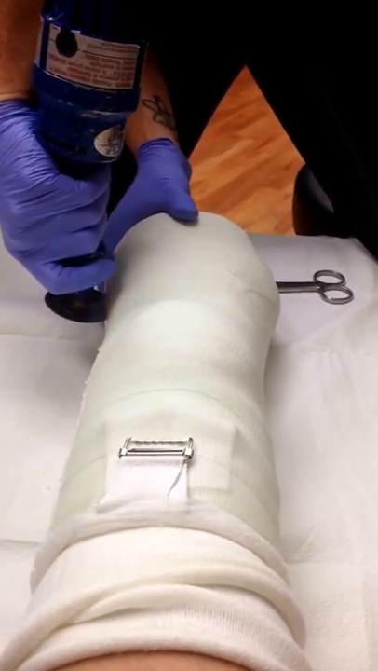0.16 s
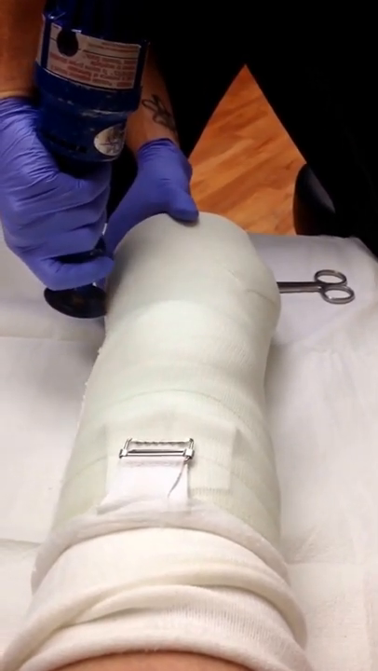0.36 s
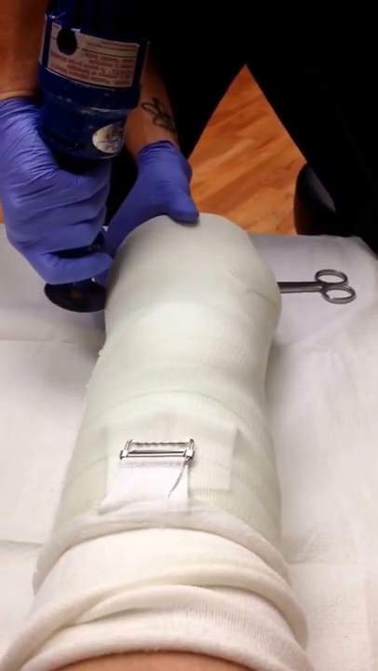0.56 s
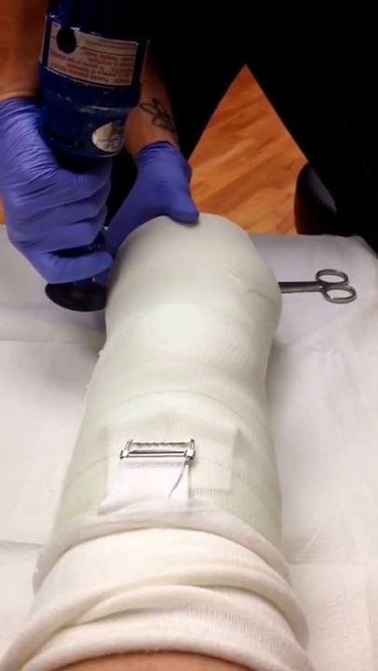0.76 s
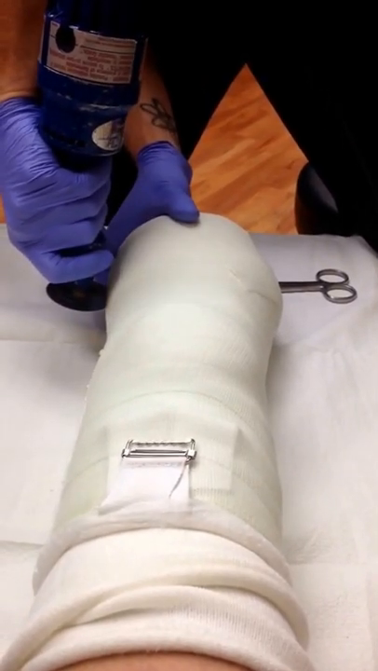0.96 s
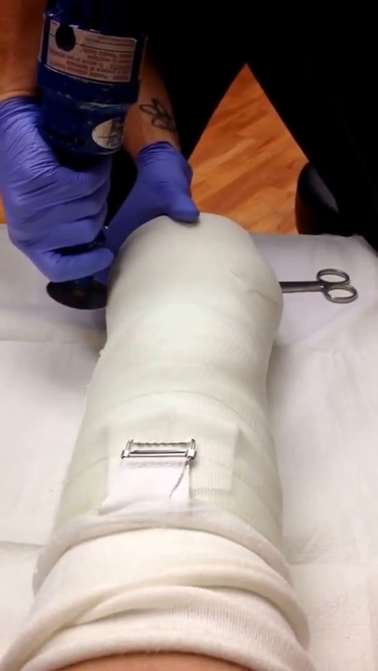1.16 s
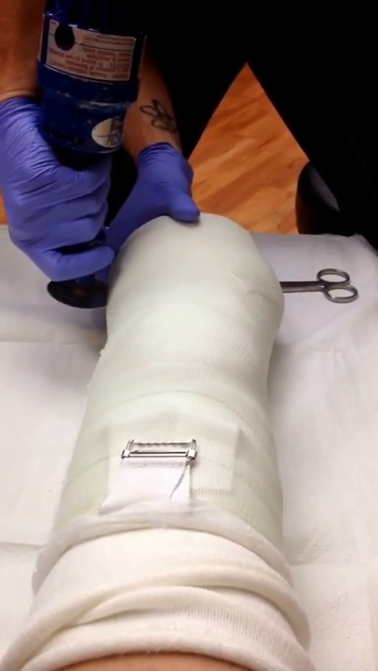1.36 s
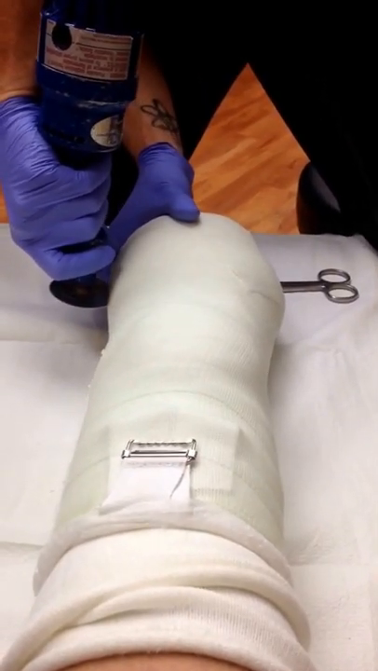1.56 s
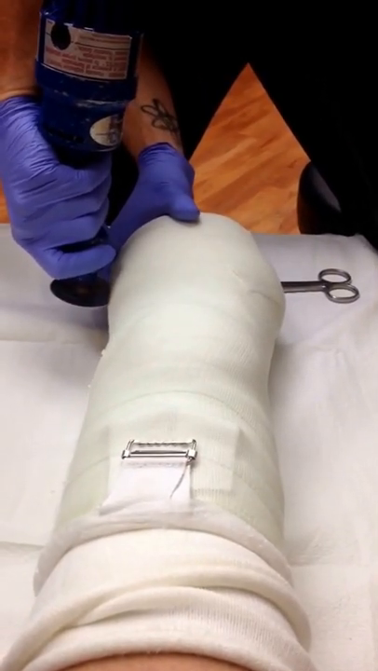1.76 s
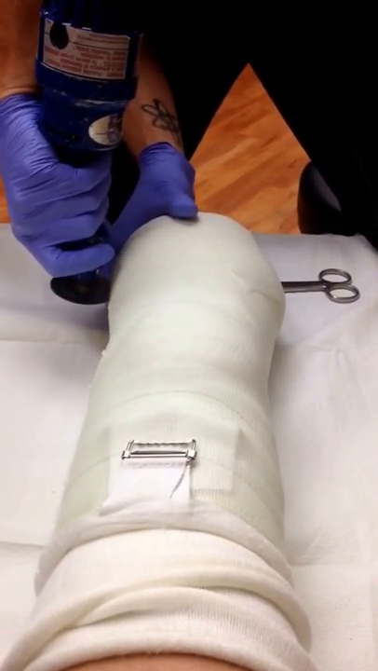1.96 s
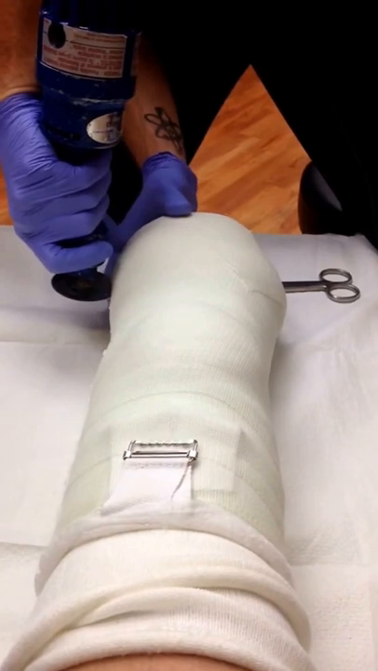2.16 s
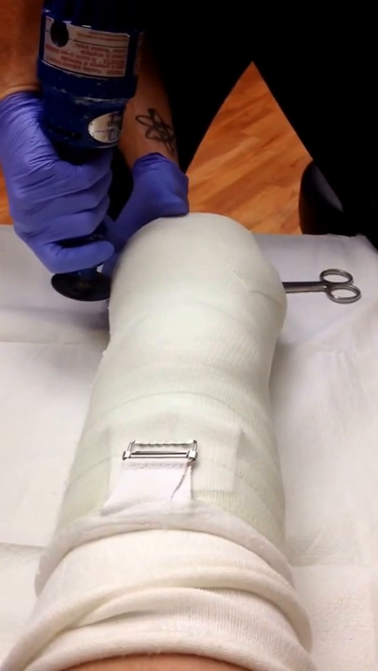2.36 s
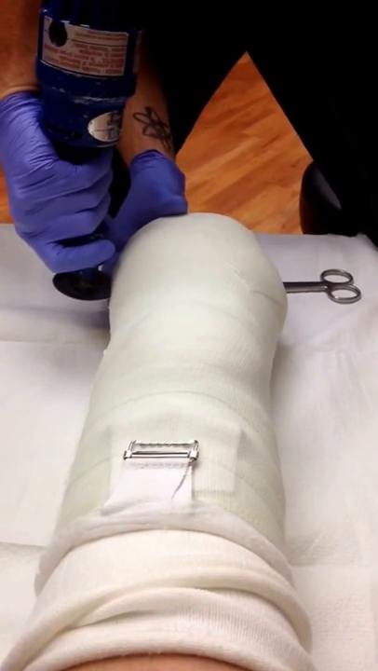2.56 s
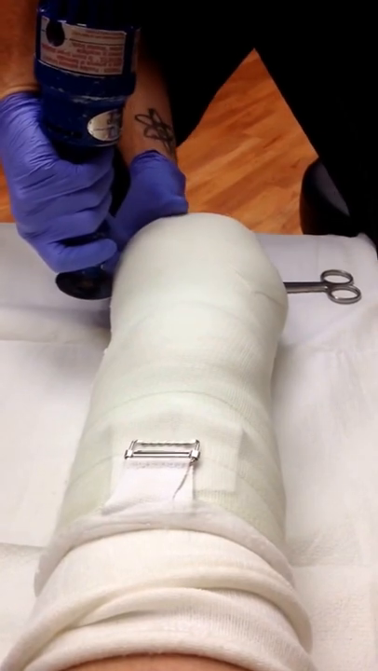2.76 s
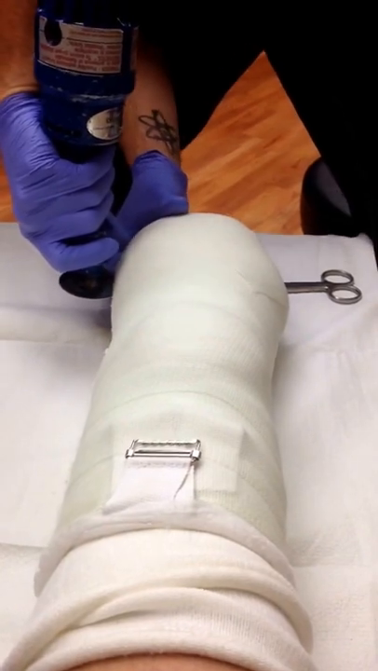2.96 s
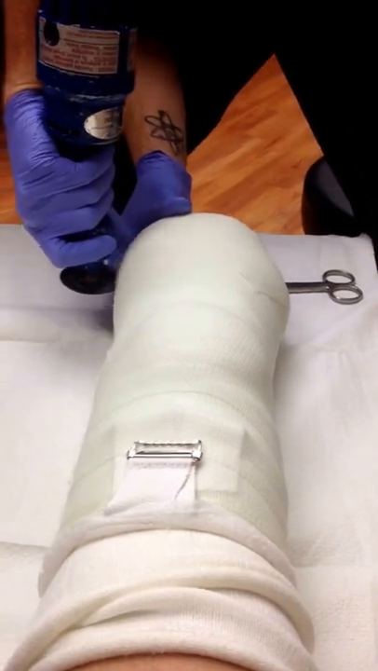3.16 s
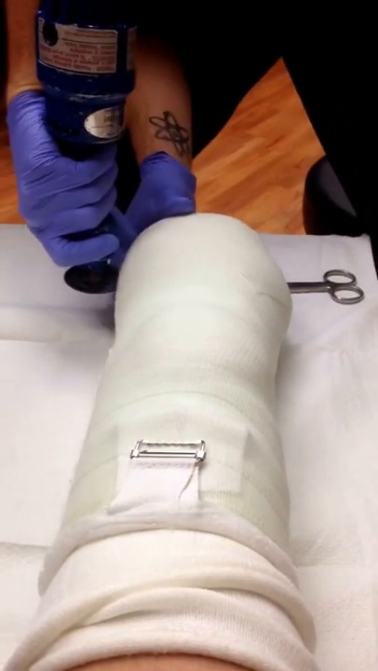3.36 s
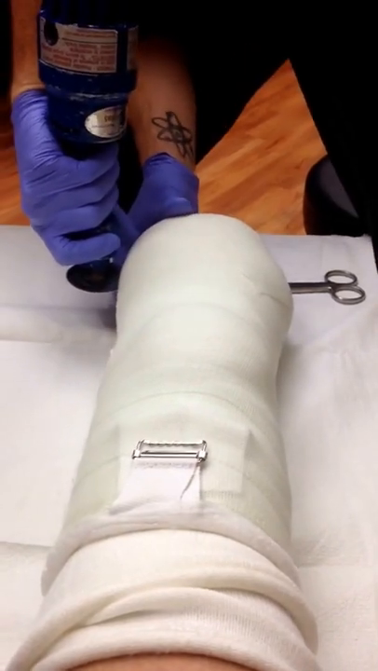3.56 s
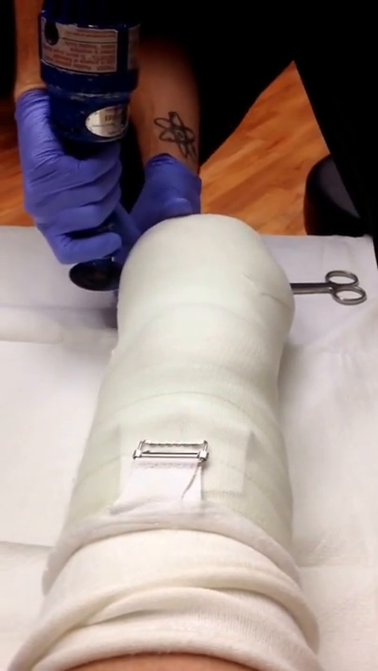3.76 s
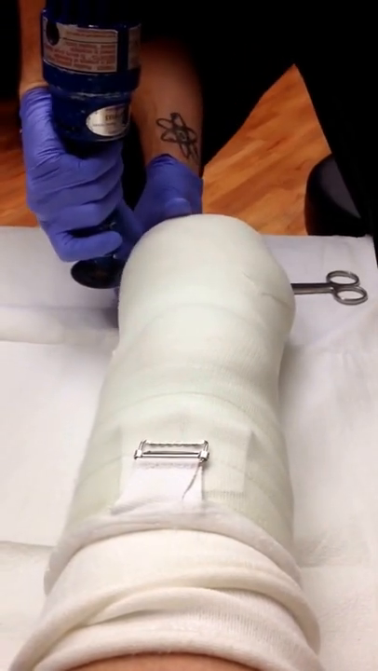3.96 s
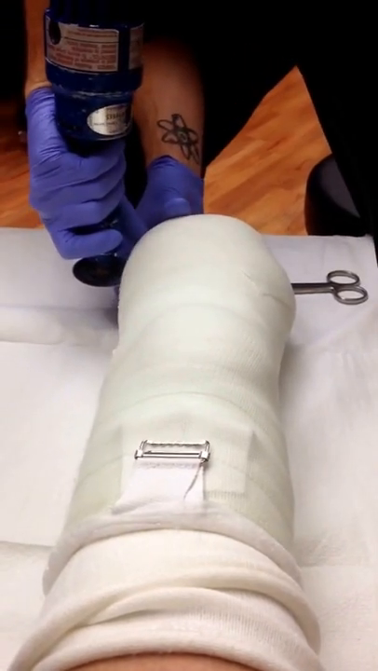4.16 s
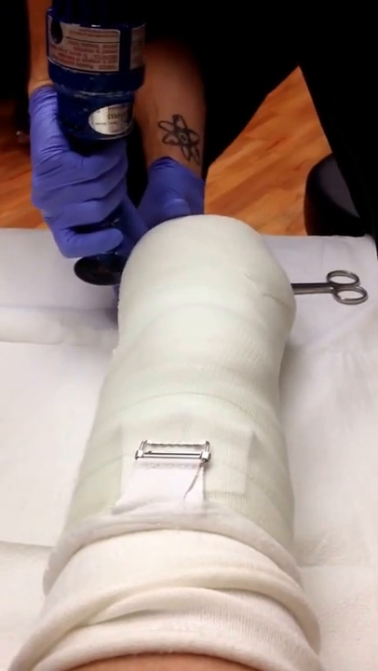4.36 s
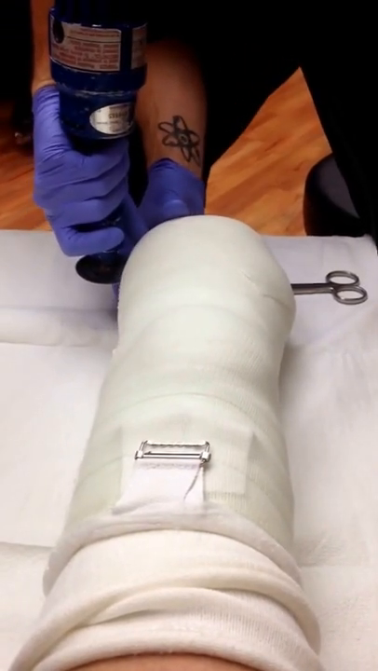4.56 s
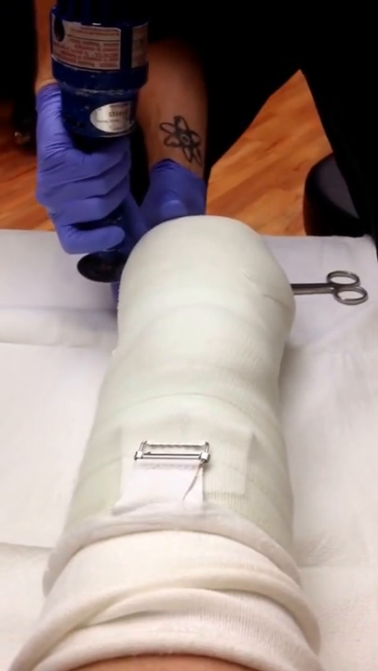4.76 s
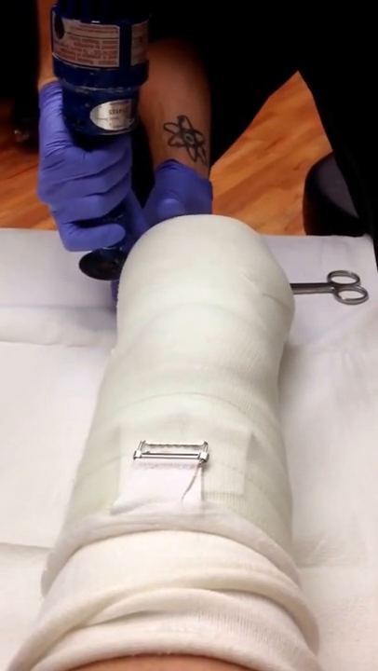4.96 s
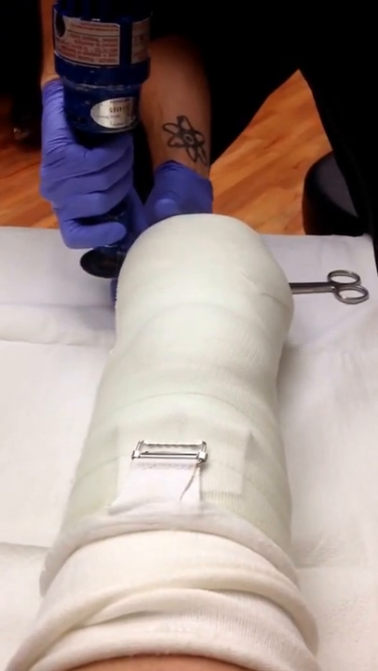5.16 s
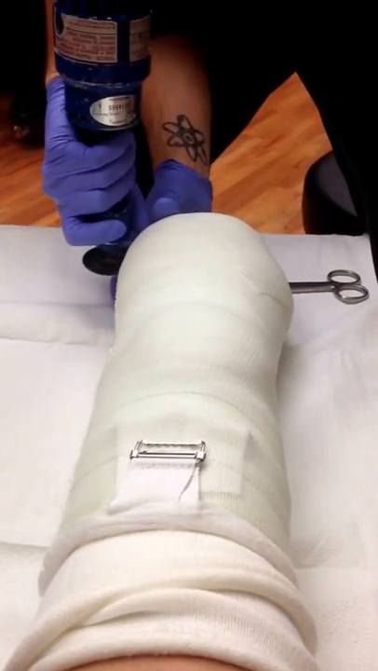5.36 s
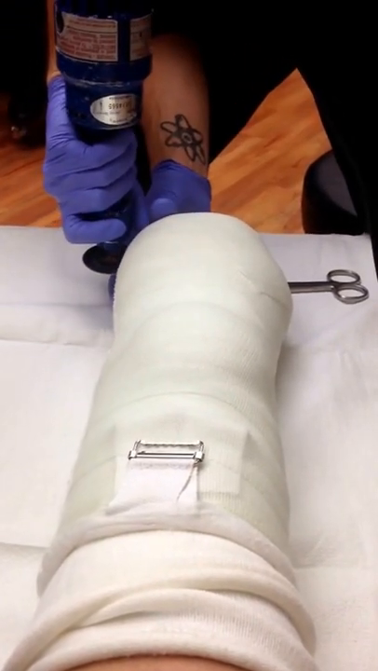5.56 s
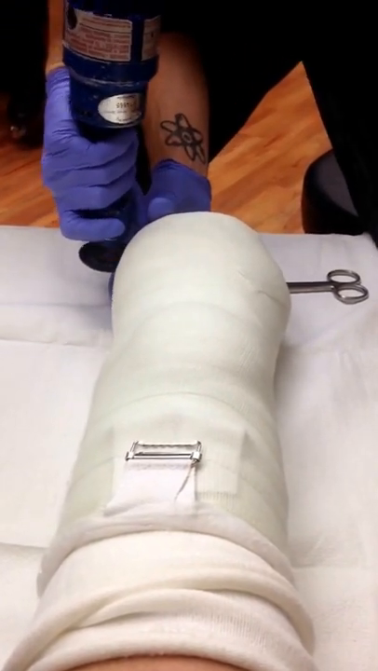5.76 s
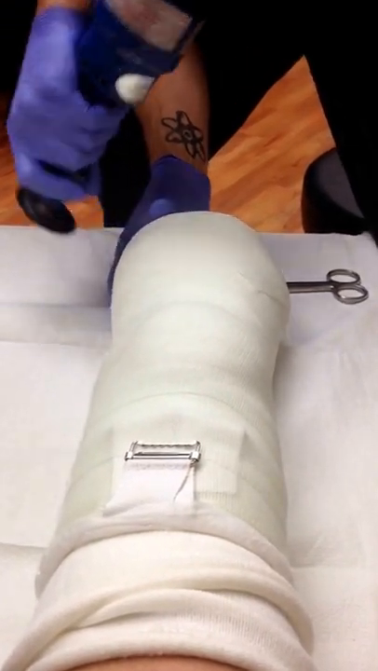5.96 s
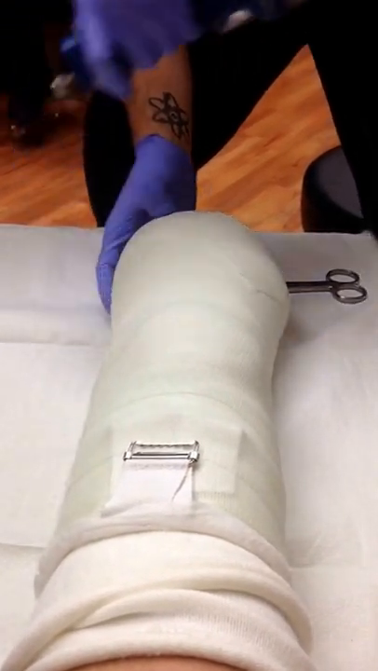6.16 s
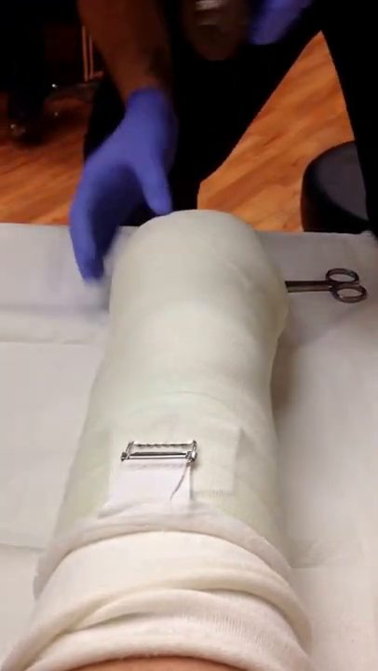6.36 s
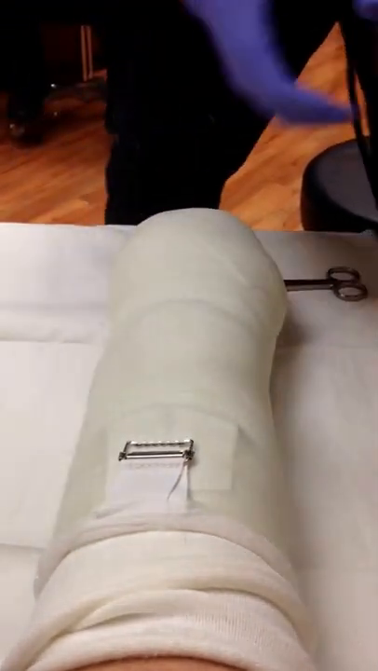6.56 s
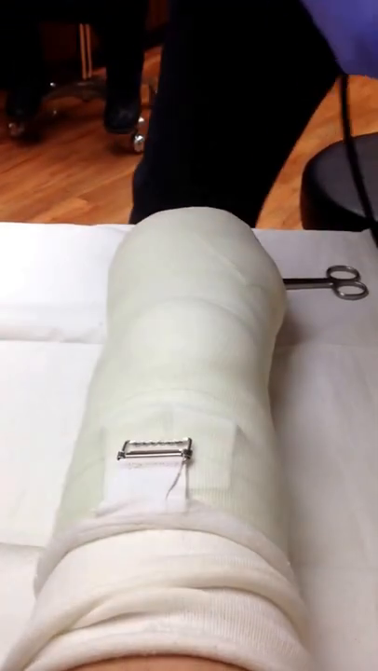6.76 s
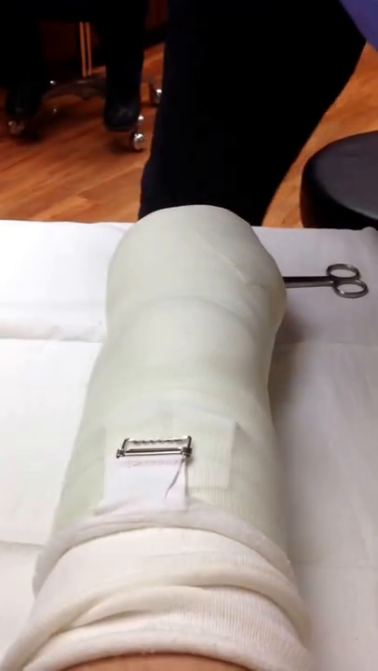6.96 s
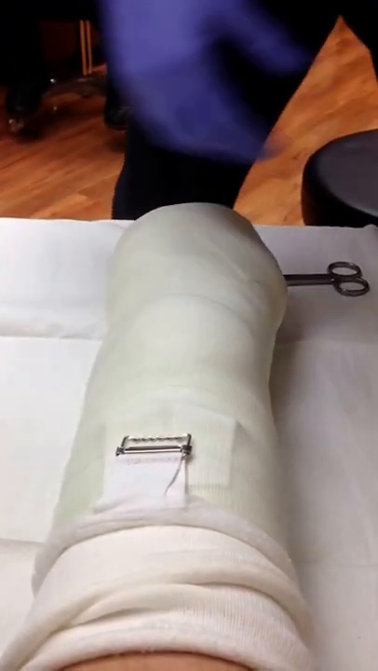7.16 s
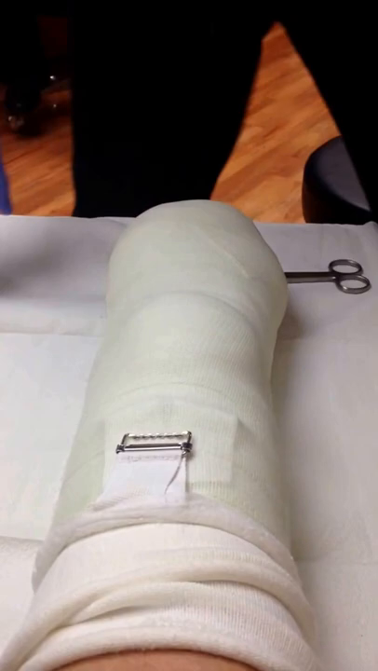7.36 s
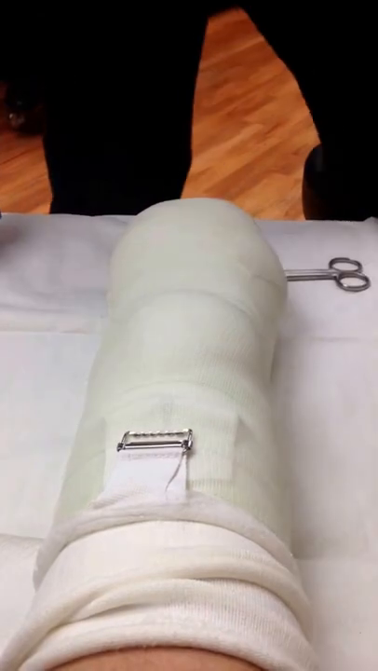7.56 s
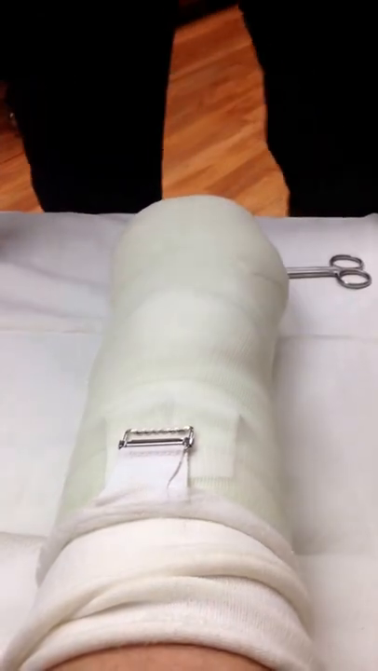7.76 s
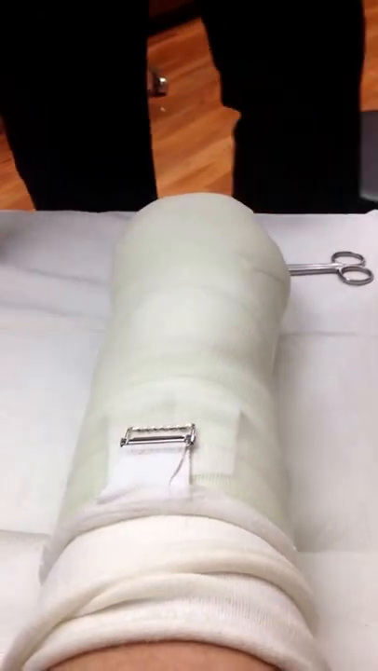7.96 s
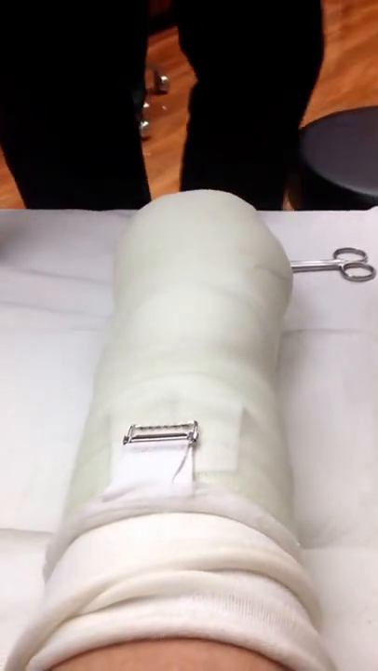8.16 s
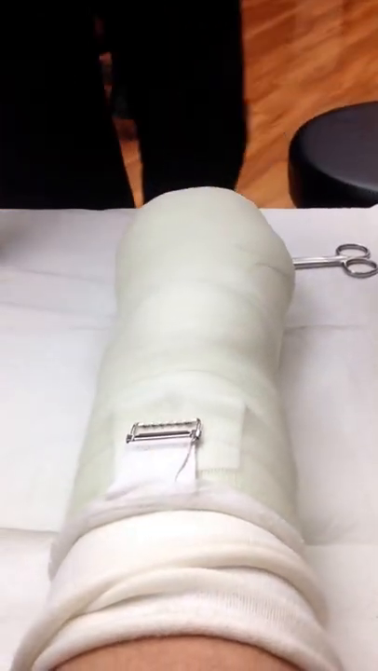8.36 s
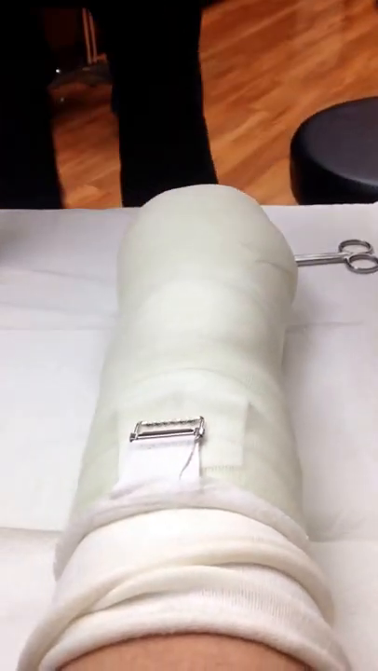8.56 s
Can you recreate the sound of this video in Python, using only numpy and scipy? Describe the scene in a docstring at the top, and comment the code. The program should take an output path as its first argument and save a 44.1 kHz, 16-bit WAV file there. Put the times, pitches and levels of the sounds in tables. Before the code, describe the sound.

An electric oscillating saw cuts a hard leg cast with a loud hum, buzz and gritty rasp, its pitch sagging under pressure. After about six seconds it lifts out and winds up to a higher whine, the loose steel blade jingling and squealing. Cooling air rushes throughout, and a few very faint steps pass underneath. The microphone is close, in a clinic room.

```python
"""An oscillating cast saw bites along a hard leg cast, lifts out near 5.9 s and is carried off running.
Every stroke shakes the shell into a hum and buzz while fibres rasp in the slot; load drags the pitch down.
Out of the cut the motor winds up, its gears whine and the loose steel blade jingles and squeals.
Cooling air rushes throughout, over faint mains hum and a few soft steps. Close up, in mono."""
import sys
import numpy as np
from scipy import signal
from scipy.fft import rfft, irfft, next_fast_len
from scipy.io import wavfile
from scipy.ndimage import uniform_filter1d

SR = 44100
rng = np.random.default_rng(int(sys.argv[2]) if len(sys.argv) > 2 else 0)


def unload_wav(signal):
    """Save mono or channel-first audio to the path in sys.argv[1] as 16-bit WAV at rate SR, clipped to [-1, 1]."""
    wavfile.write(
        sys.argv[1],
        SR,
        np.round(np.clip(np.atleast_2d(signal).T, -1, 1) * 32767).astype(np.int16),
    )


N = 379242
T = np.arange(N) / SR
PHASES = rng.random(size=32)  # start of each harmonic, in turns
HEEL_FROM_S, LIFT_S = 4.1, 5.9  # the cut turns from side wall to heel; the blade leaves the slot
USUAL_HZ, FREE_HZ = 245.1, 317.4  # stroke rate under an ordinary push, and running free
RIPPLE_HZ, RIPPLE_TURNS = 120, .002  # torque ripple, and how far it shifts the stroke

# stroke rate in the cut: t/s, f/Hz
LOADED_SPEED = [(0.0, 271), (0.31, 259), (0.47, 264), (0.67, 259), (1.08, 240.6), (1.43, 232.6),
                (1.71, 231.7), (1.97, 233.8), (2.27, 249), (2.66, 247.6), (2.87, 244.3), (3.15, 229.4),
                (3.28, 235.5), (4.06, 235.5), (4.11, 243.4), (4.36, 247.5), (4.91, 247), (5.34, 244.7),
                (5.58, 246), (5.86, 256.5)]
# base hum of the shell, harmonics 1 to 3: t/s, first/dB, second/dB, third/dB
SHELL_HUM = [(.15, -28.5, -35, -23), (.37, -32, -45, -30), (.62, -30, -28, -29), (.95, -29.5, -33.5, -30),
             (1.4, -31, -31.5, -34), (2.1, -30.5, -37, -37), (2.5, -31, -36.5, -32), (3.1, -33, -40, -35),
             (4.05, -38.5, -44, -39), (4.3, -37.5, -43, -27), (4.7, -38, -40, -25.5),
             (4.98, -36, -37.5, -23), (5.42, -36, -35.5, -30.5), (5.66, -34.5, -35.5, -20.5),
             (5.85, -34.5, -43, -20)]
# the hand leans in or eases off: t/s, length/s, change of the hum's fundamental/dB
HAND_PUSHES = [(.97, 0.076, 3.5), (1.163, 0.039, -5.5), (1.69, 0.07, 0.5), (3.14, 0.051, 1.5),
               (4.742, .05, -4), (5.64, 0.072, 1)]
# colour of the buzz along the side wall: f/Hz, level/dB
WALL_COLOUR = [(900, -2), (1030, 4.5), (1250, -2), (1650, -2), (2400, -1.5), (3200, -2), (4100, -3),
               (4800, -8), (5250, -4), (5900, -11), (6900, -6.5), (8000, -15), (11000, -11)]
# colour of the buzz at the heel: f/Hz, level/dB
HEEL_COLOUR = [(990, -7.5), (1235, -8.5), (1480, -5), (1730, -4.5), (1980, -8.5), (2230, -6.5),
               (2475, -1.5), (2720, -12), (3700, -10.5), (4500, -12.5), (6400, -17.5), (6920, -9),
               (7500, -24.5), (12000, -21.5)]
# travelling resonance of the sliding contact: t/s, f/Hz
CONTACT_PEAK = [(0, 2550), (.7, 2750), (1.0, 1750), (1.35, 3300), (2.0, 3100), (2.35, 2400), (3.0, 1900),
                (4.1, 1650)]
# the teeth dig deeper: t/s, length/s, buzz boost/dB, resonance/Hz
TOOTH_BITES = [(.12, 0.26, 1, 2520), (0.55, 0.15, 1.5, 2720), (0.911, 0.053, 4, 1760),
               (1.063, 0.1, 1.5, 980), (1.346, 0.057, 3, 3700), (1.461, 0.042, 3.5, 1470),
               (1.742, 0.04, 4, 2570), (1.844, 0.072, 0.5, 3600), (2.15, .04, 2, 2880),
               (2.27, .045, 2.5, 2800), (2.335, 0.045, 3.5, 1950), (2.55, .1, 2, 2580),
               (2.81, 0.024, 6, 2148), (2.96, 0.049, 3, 1683), (4.431, 0.11, 3, 1540),
               (4.621, 0.031, 4.5, 1787), (4.897, 0.047, 3.5, 2460), (5.177, 0.12, 2.5, 1230),
               (5.295, 0.036, 2, 2400), (5.526, .05, 3, 1750)]
# the teeth lose their grip: t/s, length/s
TOOTH_SLIPS = [(2.09, 0.041), (3.283, 0.027), (4.053, 0.044)]
# colour of the cutting rasp: f/Hz, level/dB
RASP_COLOUR = [(60, -58), (200, -17), (550, -15), (850, -3), (1020, 6), (1400, -8.5), (1650, -3), (2600, 1),
               (4400, 0), (5200, 0), (5900, -6), (6900, -1), (8500, -6.5), (12000, -5), (13100, -3),
               (15000, -6)]
# the flat of the blade rubs the slot: t/s, length/s, level/dB
SLOT_SCRAPES = [(.47, .07, -27), (3.25, 0.13, -30.5), (5.72, 0.023, -34)]
# resonances of that scrape: f/Hz, width/Hz, level/dB
SLOT_MODES = [(2220, 470, -5), (2700, 270, -1)]
# crank and gear lines: stroke harmonic, level within its group/dB
MOTOR_LINES = [(1, -17), (2, -23), (4, -12), (6, -12), (7, -8), (8, -11), (9, -4), (10, -5), (11, -9),
               (12, -11), (13, -5), (14, -5), (15, -6), (16, -2), (17, -9), (18, -11), (19, -14), (20, -14),
               (21, -12), (22, -9), (23, -17), (24, -17), (25, -19)]
# fader for the gear group, harmonics 6 to 10: t/s, level/dB
GEAR_FADER = [(6.15, -28), (6.6, -33), (7.2, -36), (7.5, -30), (7.85, -33), (8.25, -24.5), (8.6, -27)]
# two lead motor tones, harmonics 3 and 5: t/s, third/dB, fifth/dB
LEAD_TONES = [(6.1, -42, -37), (6.5, -43, -37), (6.65, -36, -37), (7.0, -32, -28.5), (7.17, -32.5, -29.5),
              (7.35, -27, -34.5), (7.55, -33.5, -27), (7.75, -45, -32), (7.95, -44, -32), (8.05, -41, -26),
              (8.22, -34, -25), (8.42, -32.5, -30), (8.58, -35, -40)]
# the blade's lower ring: f/Hz, width/Hz, level/dB
LOW_MODES = [(4600, 110, -5), (4930, 350, -8), (5110, 150, 0), (6270, 80, -5)]
# the blade's top sizzle: f/Hz, width/Hz, level/dB
HIGH_MODES = [(13000, 150, 1), (13500, 2200, -14), (13720, 270, -2), (14060, 150, 0)]
# the blade shakes loose on its hub: t/s, length/s, low modes/dB, high modes/dB
HUB_JINGLES = [(0.076, 0.088, -27, -29), (.47, 0.091, -34, -23), (1.65, 0.23, -34, -42),
               (5.903, 0.033, -29, -24), (6.088, 0.083, -25, -24.5), (6.392, 0.07, -22, -19),
               (6.561, 0.067, -24, -26), (6.804, 0.097, -23, -18), (7.049, 0.074, -31, -19),
               (7.217, 0.056, -26.5, -30), (7.446, 0.068, -29, -27)]
# a stroke harmonic sings in the blade or housing: t/s, length/s, level/dB, harmonic
SINGING_LINES = [(6.16, 0.055, -26, 13), (6.23, 0.049, -28, 11), (6.298, 0.11, -31, 6),
                 (6.352, 0.024, -18, 17), (6.451, 0.024, -17, 17), (6.54, 0.04, -19, 15),
                 (6.633, 0.029, -25, 16), (6.709, 0.094, -23, 15), (6.76, 0.068, -28, 11),
                 (6.8, .12, -36, 6), (6.832, 0.053, -16, 20), (6.9, 0.12, -31, 19), (6.954, .08, -37, 7),
                 (7.206, 0.062, -27, 11), (7.449, 0.16, -29, 16), (7.587, 0.12, -33, 6),
                 (7.899, 0.097, -32, 9), (8.2, .12, -32, 7)]
# a blade mode squeals: t/s, length/s, level/dB, f/Hz
BLADE_SQUEALS = [(.5, .12, -35, 6790), (5.91, .014, -27, 6320), (6.33, .022, -26, 6290),
                 (6.41, .025, -25, 6280), (6.41, .022, -31, 8570), (6.55, .04, -29, 6265),
                 (6.68, .12, -22, 4600), (7.22, .05, -27, 4945), (7.47, .07, -28, 13620)]
# colour of the cooling air: f/Hz, level/dB
AIR_COLOUR = [(25, -38), (65, -21.5), (180, -24.5), (300, -14), (520, -13.5), (750, 0.5), (1100, 1),
              (1500, 0), (1900, -2), (2600, -4), (4000, 0.5), (5800, 0), (7000, 1.5), (8500, -2),
              (11000, -9), (15000, -5.5)]
# soft steps on the floor: t/s, length/s, level/dB, thud/Hz
FOOTFALLS = [(6.42, 0.059, -55, 90.2), (6.87, 0.12, -55, 95), (7.0, 0.031, -53, 115),
             (7.78, 0.037, -50, 150), (8.452, 0.026, -51, 125)]


def cut(hz, turns, sag_hz, buzz_db=-22, rasp_db=-23.5, duck=.44):
    """Teeth in the slot: shell buzz, scrapes and a crackle of snapping fibres; bites trade rasp for buzz."""
    bite_db = sum(db * bell(s, length) for s, length, db, _ in TOOTH_BITES) + .6 * walk(17)
    glide_db = -3.5 * bell(2.52, .27)  # the blade runs cleanly and the rasp thins
    rasp_gain = undb(rasp_db - duck * bite_db + slipping() + glide_db)  # a slip adds 1 dB
    forward = once_a_stroke(turns, .15)
    fibres = rng.standard_normal(N) * undb(2 * walk(450)) * forward
    rasp = shimmer(colour(fibres, RASP_COLOUR), depth_db=2, span_s=.035, span_hz=600)
    rasp *= rasp_gain * (1 - after(LIFT_S + .11, .19))
    scrape = swells(SLOT_SCRAPES) * ring(forward, SLOT_MODES)
    in_slot = 1 - after(LIFT_S - .03, .035)
    return rasp + scrape + buzz(hz, turns, sag_hz) * undb(buzz_db + bite_db) * in_slot


def buzz(hz, turns, sag_hz, hop=64):
    """Each stroke shakes the shell; its harmonics break into chatter under a hard push and at the heel."""
    t = T[::hop]
    orders = np.arange(4, 44)[:, None]
    heel = after(HEEL_FROM_S, .054)[::hop]
    gains = shell_resonance(orders * hz[::hop], heel, hop)
    # long grips favour some lines; quick skips chop them into dashes
    gains *= undb(3 * (1 - heel / 2) * grip(t, len(orders), .11).real)
    skipping = .8 * grip(t, len(orders), .048) + .6 * grip(t, len(orders), .024)
    steady = np.exp(2j * np.pi * rng.random(orders.shape))
    chatter_share = np.clip(.32 + .033 * sag_hz[::hop] + .54 * heel, .2, .9)
    gains = gains * (np.sqrt(1 - chatter_share) * steady + np.sqrt(chatter_share) * skipping)
    power = np.sum(abs(gains) ** 2, axis=0)
    gains /= np.sqrt(uniform_filter1d(power, size=60))
    # the teeth catch a little early or late
    caught = turns + .0012 * walk(170) + .0077 * walk(30) + RIPPLE_TURNS * ripple()
    stroke = np.exp(2j * np.pi * caught)
    out, harmonic = 0, stroke ** orders[0, 0]
    for gain in gains:
        out += np.real(np.interp(T, t, gain) * harmonic)
        harmonic *= stroke
    return unit(out)


def shell_resonance(line_hz, heel, hop):
    """Gain of each buzz line: the shell's colour, a broad contact peak and a narrower peak for each bite."""
    def peak(centre_hz, octaves):
        return np.exp(-.5 * (np.log2(line_hz / centre_hz) / octaves) ** 2)

    body = (1 - heel) * gain_at(line_hz, WALL_COLOUR) + heel * gain_at(line_hz, HEEL_COLOUR)
    contact_hz, = curves(CONTACT_PEAK)
    contact_db = 2.5 * (1.5 - heel) * peak(contact_hz[::hop], octaves=.33)
    biting = sum(bell(s, length)[::hop] * peak(hz, octaves=.22) for s, length, _, hz in TOOTH_BITES)
    return body * undb(contact_db + 3.5 * (1 - heel / 2) * biting)


def grip(t, lines, grip_s):
    """Random strength and phase for each line, held while the teeth grip and redrawn when they skip."""
    skip_times = np.cumsum(rng.uniform(.5, 1.5, size=2048)) * grip_s
    draws = rng.standard_normal(size=(2049, lines, 2)) @ [1, 1j] / np.sqrt(2)
    return uniform_filter1d(draws[np.searchsorted(skip_times, t)].T, size=11, axis=1)


def slipping():
    """Swells to 1 each time the teeth lose their grip."""
    return sum(bell(s, length) for s, length in TOOTH_SLIPS)


def shell_hum(turns, sag_hz, db_per_sag_hz=.2):
    """The whole cast flexes on the lowest three harmonics: fuller under a push, ducking on a slip."""
    surge_db = -14 * slipping() + sum(db * bell(s, length) for s, length, db in HAND_PUSHES)
    hum = 0
    for k, db in enumerate(curves(SHELL_HUM), 1):
        waver_db = 1.5 * walk(14) + .5 * walk(35)
        hum += undb(db + db_per_sag_hz * sag_hz + surge_db / k + waver_db) * partial(turns, k)
    return hum * (1 - after(LIFT_S - .01, .024))


def stroke_rate(relief_s=5.855, spin_up_s=.37):
    """Strokes per second: held down by the load, then easing up to the free speed."""
    loaded_hz, = curves(LOADED_SPEED)
    return FREE_HZ + (loaded_hz - FREE_HZ) * np.exp(-np.maximum(T - relief_s, 0) / spin_up_s)


def motor(hz, turns, loaded_db=-13, whine_power=13):
    """Two lead tones, crank hum, gear lines and a top whine that climbs steeply in level with speed."""
    shaft = turns + .00076 * walk(65) + RIPPLE_TURNS * ripple()
    # a quick swing of the saw flutters the lines and turns the hum away
    swing = after(LIFT_S, .037) * (1 - after(7.1, .4))
    crank_db = -27 - 6 * swing
    gear_db, = curves(GEAR_FADER)
    top_db = -27.5 + 20 * whine_power * np.log10(hz / FREE_HZ)
    out = sum(undb(db + .6 * walk(25)) * partial(shaft, k) for k, db in zip((3, 5), curves(LEAD_TONES)))
    for k, db in MOTOR_LINES:
        group_db = crank_db if k <= 4 else gear_db if k <= 10 else top_db
        room_db = 2.5 * walk(3.7)  # slow fading in the room's standing waves
        waver_db = room_db + 2 * swing * walk(22) + 1.6 * walk(30)
        flutter = .042 * swing * walk(45) / max(k, 8)
        out += partial(shaft + flutter, k) * undb(group_db + db + waver_db * min(k / 6, 1))
    free = after(LIFT_S, .031)
    return out * (free + (1 - free) * undb(loaded_db))


def ripple():
    """The motor's torque pulses on every half wave of the mains."""
    return np.sin(2 * np.pi * RIPPLE_HZ * T)


def blade(turns, rattle_hz=93):
    """The steel blade rattles on its hub: damped in the slot, ringing and singing in free air."""
    rattle = rattle_hz * T + .11 * walk(24)
    throb = once_a_stroke(turns, .57) * once_a_stroke(rattle, .39)
    # ripple and rattle put side tones around the stroke harmonics
    harmonics = sum(partial(turns, k) for k in range(13, 22))
    side_tones = undb(-8) * harmonics * (ripple() + .5 * partial(rattle, 1))
    low, high = ring(throb, LOW_MODES, side_tones), ring(throb, HIGH_MODES)
    low /= np.sqrt(uniform_filter1d(low ** 2, size=1500))  # even out the level
    out = undb(-32.5) * slipping() * low + undb(-41) * high
    out += after(5.8, .024) * (undb(-28) * low + undb(-33) * high)  # steady free ring
    for s, length, low_db, high_db in HUB_JINGLES:
        out += bell(s, length) * (undb(low_db) * low + undb(high_db) * high)
    singing = sum(undb(db) * bell(s, length) * partial(turns, k) for s, length, db, k in SINGING_LINES)
    return out + (singing + squeals()) * undb(2 * walk(90))


def squeals(waver_turns=.15):
    """Blade modes flare up for a moment, each at its own slightly unsteady pitch."""
    return sum(undb(db) * bell(s, length) * partial(hz * T + waver_turns * walk(60), 1)
               for s, length, db, hz in BLADE_SQUEALS)


def cooling_air():
    """The fan blows through the vents, louder once the saw is raised; the mids dip as they face away."""
    rush = shimmer(colour(rng.standard_normal(N), AIR_COLOUR), depth_db=1.4, span_s=.11, span_hz=700)
    mids = signal.sosfiltfilt(signal.butter(2, [1100, 3800], "bandpass", fs=SR, output="sos"), rush)
    away_db = -3.5 * bell(6.98, .28)
    rush += mids * (undb(away_db) - 1)
    return rush * undb(-28.5 + 6.3 * after(LIFT_S, .029))


def footsteps():
    """Soft footfalls, each a dull thud of low noise."""
    out = 0
    for s, length, db, hz in FOOTFALLS:
        thud = [(30, -32), (.72 * hz, -12), (hz, 0), (1.4 * hz, -12), (400, -16), (1500, -45)]
        out += undb(db) * bell(s, length) * colour(rng.standard_normal(N), thud)
    return out


def mains_hum():
    """A faint electrical tone under the room."""
    return undb(-72) * partial(RIPPLE_HZ * T, 1)


def undb(db):
    """Decibels to gain."""
    return 10 ** (np.asarray(db) / 20)


def unit(x):
    """Scale to rms 1."""
    return x / np.sqrt(np.mean(x ** 2))


def curves(table):
    """One automation curve for each column after the time."""
    s, *columns = np.transpose(table)
    return [np.interp(T, s, column) for column in columns]


def after(s, fade):
    """A smooth fade from 0 to 1 around time s."""
    return .5 + .5 * np.tanh((T - s) / fade)


def bell(s, length):
    """A bell-shaped swell of height 1 at time s; length is its standard deviation."""
    out = np.zeros(N)
    near = slice(*np.searchsorted(T, [s - 5 * length, s + 5 * length]))
    out[near] = np.exp(-.5 * ((T[near] - s) / length) ** 2)
    return out


def swells(table):
    """One swell for each row of t/s, length/s, level/dB."""
    return sum(undb(db) * bell(s, length) for s, length, db in table)


def walk(rate):
    """Random drift with a spread near 1 and rate new targets a second."""
    points = rng.standard_normal(4096)
    return 1.2 * np.interp(T * rate, np.arange(len(points)), points)


def partial(turns, k):
    """Harmonic k of a rotation, at its own start phase; rms 1."""
    cycles = k * turns + PHASES[k]
    return np.sqrt(2) * np.sin(2 * np.pi * (cycles % 1))


def once_a_stroke(turns, depth):
    """A gain that peaks once a turn."""
    return np.exp(depth * np.cos(2 * np.pi * turns))


def gain_at(hz, spectrum):
    """Gain at hz of an EQ curve of f/Hz, level/dB."""
    f, db = np.transpose(spectrum)
    return undb(np.interp(np.log(hz + 1), np.log(np.sort(f)), db))


def colour(x, spectrum):
    """Shape x with an EQ curve; rms 1."""
    size = next_fast_len(N)
    hz = np.arange(size // 2 + 1) * SR / size
    return unit(irfft(rfft(x, size) * gain_at(hz, spectrum), size)[:N])


def ring(throb, modes, tone=0):
    """Throbbing contact noise, plus any tone, rings each mode through two resonator passes; rms 1."""
    out = 0
    for hz, width, db in modes:
        b, a = signal.iirpeak(hz, hz / width, SR)
        drive = tone + throb * rng.standard_normal(N)
        out += undb(db) * signal.lfilter(b, a, signal.lfilter(b, a, drive))
    return unit(out)


def shimmer(x, depth_db, span_s, span_hz, size=512):
    """Bands swell and fade on their own, in patches of span_s by span_hz; rms 1."""
    bands = signal.stft(x, nperseg=size)[2]
    field = rng.standard_normal(bands.shape)
    for axis, cells in enumerate([span_hz * size / SR, span_s * SR * 2 / size]):
        field = uniform_filter1d(field, max(1, round(cells)), axis=axis)
    bands *= undb(depth_db * unit(field))
    return unit(signal.istft(bands, nperseg=size)[1][:N])


def scene():
    """One stroke phase drives shell, cut, motor and blade, over a bed of air and room sounds."""
    hz = stroke_rate()
    turns = np.cumsum(hz) / SR
    sag_hz = USUAL_HZ - hz  # the harder the push, the deeper the sag
    saw = shell_hum(turns, sag_hz) + cut(hz, turns, sag_hz) + motor(hz, turns) + blade(turns)
    mono = saw + cooling_air() + footsteps() + mains_hum()
    return np.array([mono, mono])


def record(dry, ceiling=1.6, top_hz=15300):
    """A phone close by rounds the loudest peaks and cuts the top."""
    rounded = ceiling * np.tanh(dry / ceiling)
    return signal.sosfilt(signal.ellip(12, .1, 90, top_hz, fs=SR, output="sos"), rounded)


dry = scene()
out = record(dry)
unload_wav(out)
```